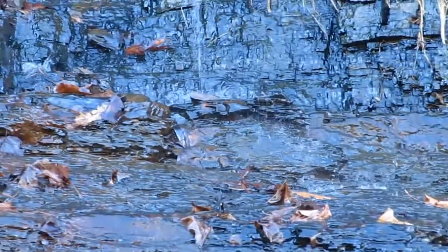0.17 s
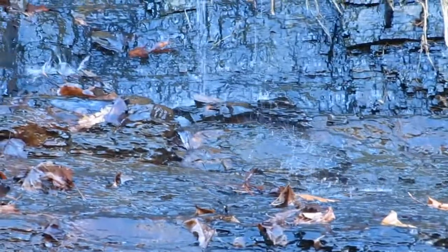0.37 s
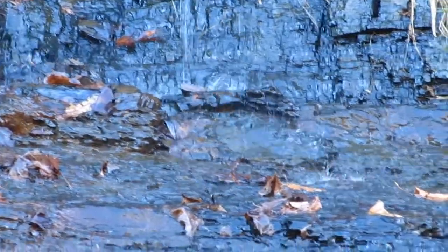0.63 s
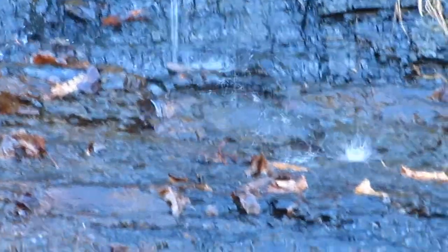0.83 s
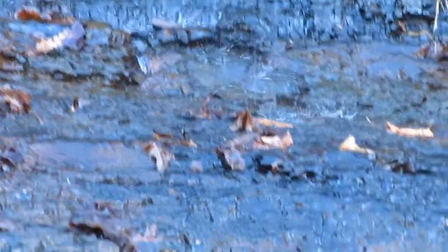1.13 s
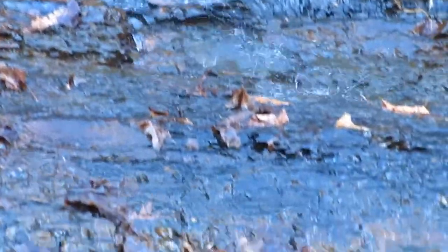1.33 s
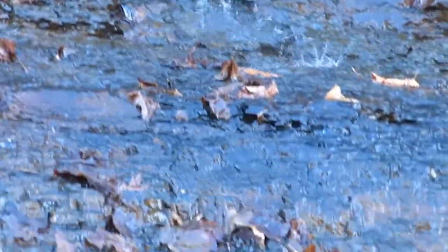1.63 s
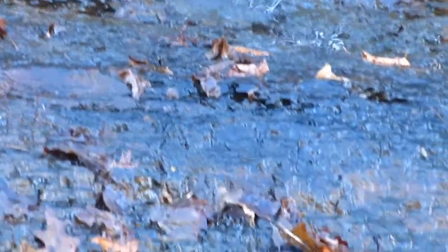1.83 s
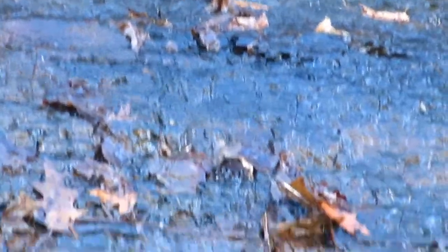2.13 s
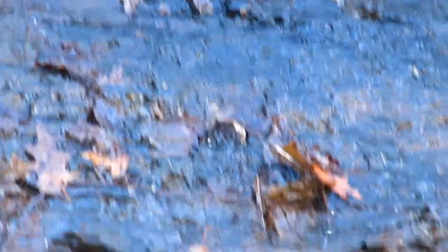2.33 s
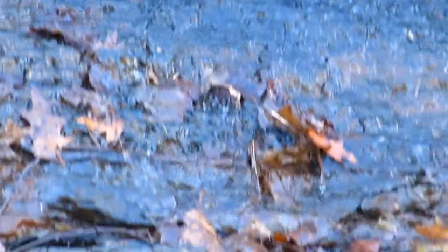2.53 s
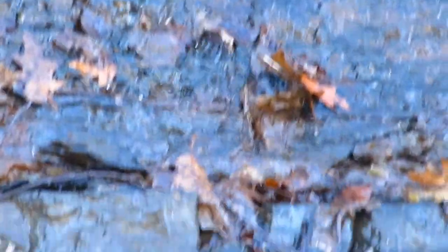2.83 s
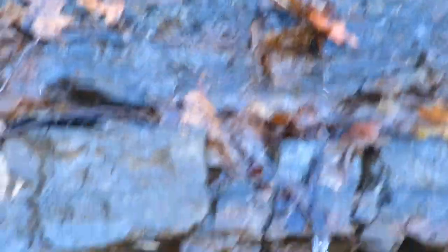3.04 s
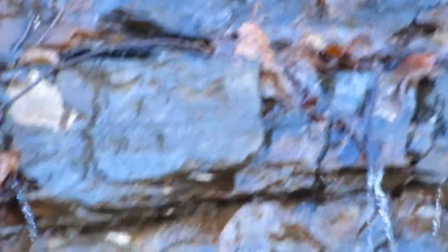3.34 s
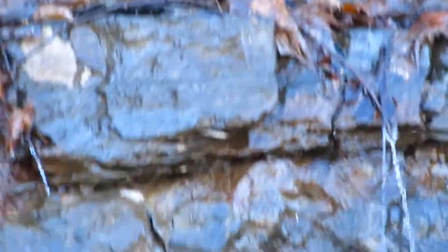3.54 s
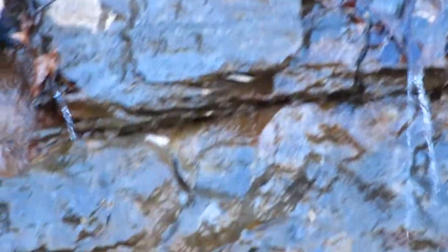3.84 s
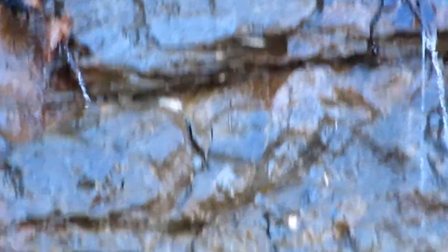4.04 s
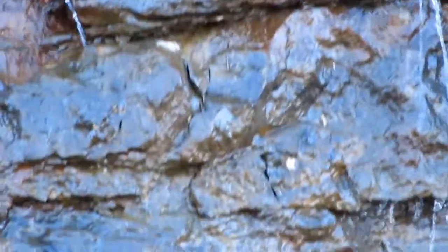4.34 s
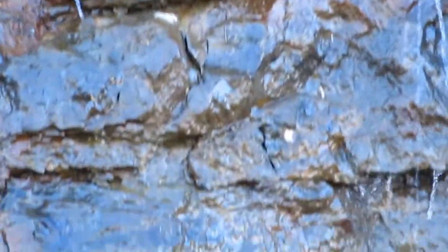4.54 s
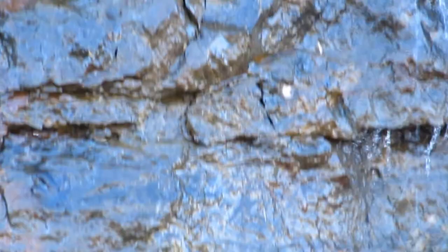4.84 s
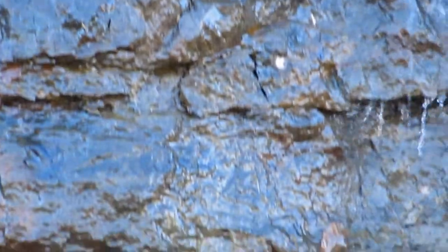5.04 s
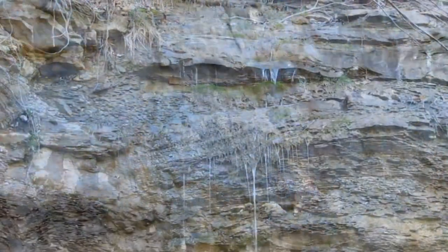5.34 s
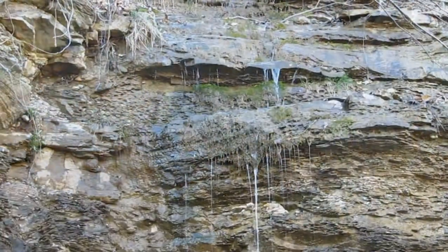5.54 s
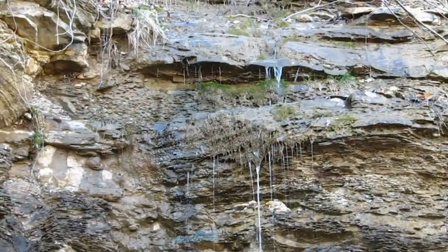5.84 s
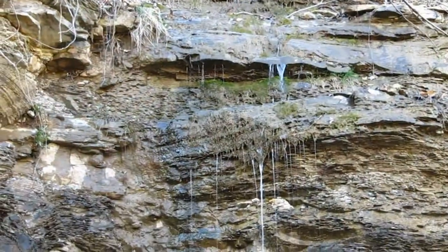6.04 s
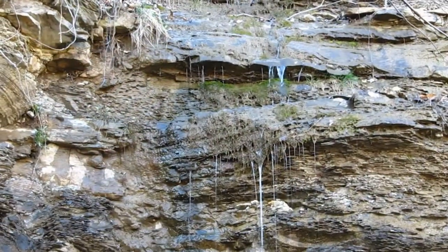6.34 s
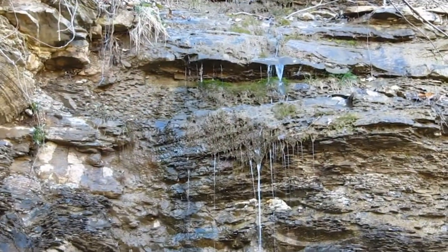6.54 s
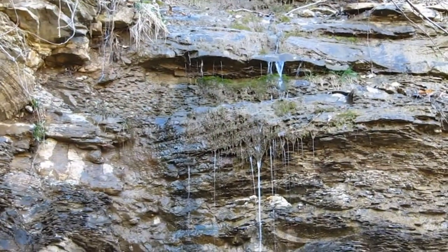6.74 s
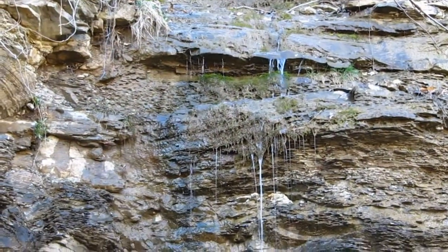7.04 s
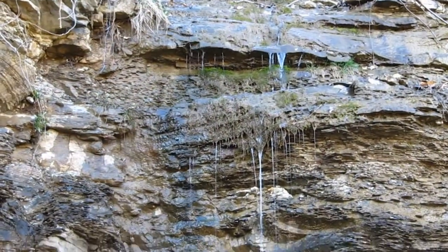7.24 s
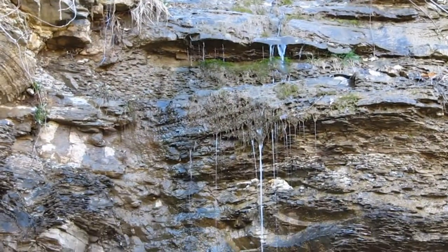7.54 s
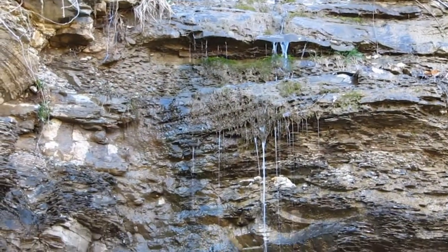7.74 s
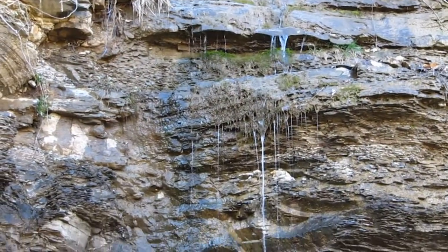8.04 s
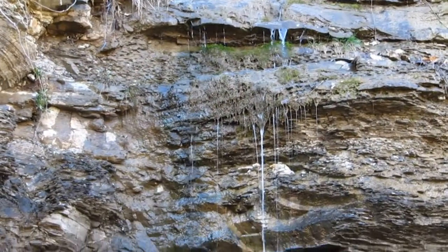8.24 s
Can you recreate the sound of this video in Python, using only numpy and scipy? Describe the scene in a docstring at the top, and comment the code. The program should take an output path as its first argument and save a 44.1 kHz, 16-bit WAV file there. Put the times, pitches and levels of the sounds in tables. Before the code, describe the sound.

Close, fizzy trickle with bright drop smacks and puddle plops under buffeting wind, then a slightly more distant trickle as the wind lulls.

```python
"""At the foot of a wet rock face, spring water trickles down and splashes, heard from close by; at 5.585 s the
scene changes and the trickle takes on another colour. The trickle is random clicks, short bursts of droplets
and blips of small bubbles, coloured for each part. Large drops smack on the rock or plop into puddles, each a
crack and a dying spray; air gurgles as ringing bubbles. Wind on the microphone is filtered pulses that swell
with gusts, plus single thumps, with a lull near the end. A dull wash comes from farther along the rock."""
import sys
import numpy as np
from scipy import signal
from scipy.fft import rfft, irfft
from scipy.io import wavfile
from scipy.ndimage import uniform_filter1d

SR = 44100
rng = np.random.default_rng(int(sys.argv[2]) if len(sys.argv) > 2 else 0)


def digitize_waveform(pressure):
    """Quantize a signal to 16-bit integers and store it at the path in sys.argv[1].

    Rows of a 2-D input are taken as channels; values are limited to [-1, 1].
    """
    field = np.atleast_2d(pressure).T
    bounded = np.clip(field, -1, 1)
    quanta = np.round(bounded * 32767).astype(np.int16)
    wavfile.write(sys.argv[1], SR, quanta)


N = 369999

# Colour of the water farther along the rock: (frequency [Hz], gain [dB])
FAR_WASH_COLOUR = [(150, -1), (250, 3), (382, 0.5), (426, 6.5), (647, 3.5), (1000, -0.5), (1180, 9),
                   (1350, -8), (2200, -120)]
# The far wash swells as the microphone swings up the rock face: (time [s], level [dB])
FAR_WASH_LEVEL = [(0, -63), (1.5, -62), (2.7, -46), (4.3, -49.5), (5.6, -54), (8.39, -57.5)]

# Light breeze on the microphone between gusts, with its lull: (time [s], level [dB])
BREEZE_LEVEL = [(0, -26), (1.45, -28), (4.4, -25.5), (6.22, -25), (6.29, -45), (6.55, -48), (7.2, -50),
                (7.5, -46), (8.39, -45)]
# Gusts over the microphone, levels before the waver: (start [s], length [s], level [dB])
WIND_GUSTS = [(0.154, 0.21, -22), (0.415, 0.18, -25), (0.72, 0.09, -21.5), (0.835, 0.078, -19.5),
              (1.008, 0.302, -20.5), (1.651, 0.16, -23), (1.927, 0.094, -21), (2.073, 0.21, -18),
              (2.325, 0.15, -17.5), (2.487, 0.265, -18.5), (2.768, 0.26, -18), (3.035, 0.46, -20),
              (3.49, 0.57, -19), (4.04, 0.302, -20.5), (4.587, 0.044, -19.5), (4.814, 0.13, -20),
              (5.021, 0.58, -19.5), (5.72, 0.08, -18.5), (5.839, 0.37, -19.5), (6.84, 0.025, -38),
              (7.886, 0.025, -28.5), (8.066, 0.39, -21)]
# Colour of wind on the microphone, before its bands are levelled: (frequency [Hz], gain [dB])
WIND_COLOUR = [(11, -37), (18, 3), (59, 3), (119, 2), (268, -6.5), (750, -38), (980, -38), (1650, -120)]
# Single eddies that thump the microphone, before the low-pass: (time [s], peak [dB], centre [Hz])
EDDY_THUMPS = [(0.192, -13.5, 179), (0.258, -18, 151), (1.052, -11, 110), (1.124, -10, 89.5),
               (1.193, -10.5, 149), (1.21, -11, 90), (1.555, -19, 151), (1.977, -16, 110), (2.122, -9, 189),
               (2.157, -8.5, 175), (2.177, -17, 159), (2.214, -7, 151), (2.242, -12.5, 151),
               (2.369, -7.5, 101), (2.401, -10, 200), (2.451, -7.5, 190), (2.596, -17, 307),
               (2.803, -4.5, 240), (2.973, -3, 193), (3.17, -19, 180), (3.817, -17, 174),
               (3.925, -6.5, 236), (3.949, -17, 264), (5.414, -16, 191), (5.85, -17, 196),
               (7.905, -28, 156)]

# Hollow resonances that colour all the water: (centre [Hz], width [Hz], boost [dB])
HOLLOW_RESONANCES = [(430, 38, 3), (754, 47, 4), (1160, 69, 1), (1600, 29, 4.5), (2430, 38, 2.5),
                     (2810, 18, 4), (4220, 190, 2.5)]
# Air pockets gurgling in puddles; the first bubble is 10 dB under the level:
# (time [s], level [dB], pitch [Hz])
AIR_POCKETS = [(0.02, -21, 880), (1.018, -26, 900), (3.905, -39, 550), (4.634, -21, 760),
               (5.724, -21.5, 1170), (6.133, -29, 745), (6.44, -26, 780), (6.591, -18.5, 1200),
               (6.635, -21, 1160), (6.949, -29.5, 584), (7.327, -30, 706), (7.355, -25.5, 720)]
# Drops that plop into puddles: (time [s], crack peak before the cavity rings [dB], centre [Hz],
# width [share of the centre])
PUDDLE_DROPS = [(0.0034, -12, 3070, 0.32), (0.1692, -16.5, 3430, 0.29), (0.205, -30, 1560, 0.25),
                (0.2174, -17, 3370, 0.59), (0.345, -19, 3140, 0.44), (1.0733, -24, 3760, 0.3),
                (1.3475, -10.5, 2920, 0.19), (1.6197, -12.5, 3200, 0.85), (1.7165, -22.5, 2160, 0.4),
                (3.3272, -16, 3620, 0.71), (3.43, -24, 2570, 0.44), (3.495, -17, 2260, 0.33),
                (3.6345, -18.5, 2910, 0.44), (3.916, -21, 1960, 0.27), (4.2606, -19, 1980, 0.37),
                (4.3634, -20, 1920, 0.48), (4.635, -23, 2460, 0.5), (5.0803, -22, 4170, 0.4),
                (5.1608, -11.5, 2930, 0.4), (5.6515, -17.5, 2800, 0.6), (5.7227, -16.5, 2300, 0.79),
                (5.7607, -19, 3050, 0.4), (6.3007, -19, 2940, 0.33), (6.5944, -27.5, 2070, 0.36),
                (6.8678, -10.5, 3880, 0.25), (7.0596, -22, 3380, 0.4), (7.2458, -23, 3000, 0.4),
                (7.4725, -16, 3970, 0.32), (7.544, -22, 3100, 0.26), (7.7177, -18, 4200, 0.4),
                (7.7805, -20, 3560, 0.4), (7.8447, -21.5, 3140, 0.37), (7.866, -22, 3620, 0.23),
                (8.318, -15, 2350, 0.87)]
# Large drops that smack on wet rock: (time [s], crack peak [dB], centre [Hz])
ROCK_DROPS = [(0.077, -15.5, 9400), (0.2166, -18, 8480), (0.344, -11, 9130), (0.629, -8.5, 6530),
              (1.0773, -8, 7200), (1.1158, -13, 10100), (1.1996, -11.5, 9400), (1.3483, -16, 8200),
              (1.6217, -3.5, 7800), (1.7805, -7, 9600), (2.003, -12.5, 8340), (2.554, -9, 7850),
              (2.8222, -14, 9270), (3.448, -11, 7900), (3.619, -11, 8300), (3.7238, -17, 8880),
              (4.0378, -11, 8300), (4.152, -19, 8670), (4.2612, -16, 7000), (4.557, -13.5, 8200),
              (5.093, -12.5, 7600), (5.1617, -13.5, 5400), (5.3292, -11.5, 9700), (5.5596, -8.5, 7800),
              (6.288, -9.5, 7770), (6.691, -15, 9500), (7.0303, -14, 9700), (7.146, -14.5, 9500),
              (7.805, -19, 9430), (8.2607, -14, 8600), (8.2702, -8.5, 6750)]
# Colour of the splashing from close by: (frequency [Hz], gain [dB])
CLOSE_COLOUR = [(410, -18), (700, -6), (885, -4.5), (1050, -8), (1150, 0.5), (1320, -4.5), (1590, -3),
                (1790, -4.5), (2350, -1.5), (2970, 0.5), (4450, -4.5), (6740, 2.5), (8860, 5.5),
                (11500, -3), (15700, -21.5)]
# Colour of the trickle after the scene changes: (frequency [Hz], gain [dB])
AFTER_CHANGE_COLOUR = [(410, -13), (700, -11), (767, -4.5), (840, -8.5), (1010, -6), (1090, -8.5), (1210, 1),
                       (1430, -7), (1630, -3.5), (1910, -6), (2040, -3.5), (3090, -1), (6160, -2), (9840, 6),
                       (15700, -18.5)]
# Trickle before the two gains below: (time [s], babble under 5 kHz [dB], fizz above it [dB])
TRICKLE_LEVEL = [(0, -35, -30.0), (0.55, -35.5, -28.5), (1.45, -35.5, -29), (1.85, -38.0, -31.5),
                 (2.6, -35.0, -28.5), (3.2, -36.5, -30), (3.45, -34.5, -27.5), (4.5, -34.5, -28.0),
                 (5.58, -33.0, -26.5), (5.59, -38, -33.0), (6.05, -37.5, -31), (6.45, -35.0, -30),
                 (6.8, -35, -30.5), (7.15, -36, -30.5), (7.6, -34.5, -29.0), (8.0, -37.5, -30),
                 (8.39, -31.5, -27)]

SCENE_CHANGE_S = 5.585  # the scene changes at once
BABBLE_GAIN_DB, FIZZ_GAIN_DB = -3.5, -3
SPRAY_DB, SPRAY_GROWTH = -23, 0.53  # spray of a 0 dB drop; dB of spray per dB of drop
GUST_RISE_S, GUST_FALL_S = 0.016, 0.045  # straight rise; fall to 1/e
STIFF_DB = -19  # level of a stiff gust, above which only the flutter still grows
FLUTTER_DB, FLUTTER_GROWTH = -29, 2.38  # gain above 200 Hz in a stiff gust; its dB per dB of wind
RUMBLE_DB, RUMBLE_GROWTH = -20, 0.93  # the same for the rumble under 200 Hz
WAVER_DB, WAVER_HZ = 0.5, 5.8  # random wavering of the wind: rms depth, rate above which it fades
RECORDER_EDGE_HZ = 15800


def amp(db):
    """Decibels to gain."""
    return 10 ** (np.asarray(db) / 20)


def evened(x):
    """Scales a sound to an rms of 1."""
    return x / np.sqrt(np.mean(x ** 2) + 1e-20)


def curves(rows):
    """Each column of a timed table, at every sample."""
    s, *columns = np.transpose(rows)
    return [np.interp(np.arange(N) / SR, s, c) for c in columns]


def add(mix, s, sound):
    """Adds a sound into the mix at time s."""
    part = mix[max(round(s * SR), 0):][:len(sound)]
    part += sound[:len(part)]


def coloured(x, spectrum):
    """Gives a sound a smooth spectrum, read between the points on a log frequency scale."""
    hz, db = np.transpose(spectrum)
    bins = np.fft.rfftfreq(len(x), 1 / SR)
    gain = amp(np.interp(np.log(bins + 1), np.log(hz + 1), db))
    return irfft(rfft(x) * gain, len(x))


def low_pass(hz):
    """A fourth-order low-pass."""
    return signal.butter(4, hz, fs=SR, output="sos")


def split(x, hz):
    """The parts of a sound under and above hz, each at an rms of 1."""
    low = signal.sosfiltfilt(low_pass(hz), x)
    return evened(low), evened(x - low)


def resonate(x, hz, width_hz):
    """A resonance of gain 1 at its centre."""
    return signal.lfilter(*signal.iirpeak(hz, hz / width_hz, fs=SR), x)


def impacts(size, per_s, spread_db):
    """A train of random clicks of uneven strength and either sign, at an rms of 1."""
    strength = amp(spread_db * np.minimum(rng.exponential(1, size), 4))
    sign = rng.choice([-1, 1], size)
    struck = rng.random(size) < per_s / SR
    return evened(strength * sign * struck)


def patter(per_s, spread_db, t60, tint_db, rise_s, count=17, size=3072):
    """Many middling drops, each a short spray of droplets with a random tint of its own."""
    t, out = np.arange(size) / SR, np.zeros(N)
    tint_hz = np.geomspace(600, 15000, count)
    droplets = impacts(N + size, 16000, 5.0)
    for when, heft, life, *tint in rng.random((int(per_s * N / SR), 3 + count)):
        envelope = (1 - np.exp(-t / rise_s)) * amp(-60 * t / (t60 * (.5 + life)))
        burst = envelope * droplets[int(when * N):][:size]
        colour = np.transpose([tint_hz, tint_db * np.array(tint) ** 2])  # a few bands stand out
        add(out, when * N / SR, amp(spread_db * heft ** 2) * coloured(burst, colour))
    return evened(out)


def wash():
    """Far splashing, low and soft: steady noise and a sparse patter."""
    drops = patter(per_s=45, spread_db=7.5, t60=0.023, tint_db=4, rise_s=0.0014)
    far = rng.standard_normal(N) + 1.8 * drops
    return amp(curves(FAR_WASH_LEVEL)[0]) * evened(coloured(far, FAR_WASH_COLOUR))


def wind_level():
    """Gusts rise quickly out of the breeze, hold and die away, wavering all the while; in dB."""
    t, strength = np.arange(N) / SR, amp(curves(BREEZE_LEVEL)[0])
    for s, length, db in WIND_GUSTS:
        rise = np.clip((t - s) / GUST_RISE_S, 0, 1)
        fall = np.exp(-np.maximum(t - s - length, 0) / GUST_FALL_S)
        strength = np.maximum(strength, amp(db) * rise * fall)
    rates = [(WAVER_HZ / 4, -20), (WAVER_HZ / 2, 0), (WAVER_HZ, 0), (WAVER_HZ * 4, -100)]
    waver = evened(coloured(rng.standard_normal(N), rates))
    return 20 * np.log10(strength) + WAVER_DB * waver


def wind():
    """Eddies pass the microphone as pressure bumps; they come in clumps and swell with each gust."""
    clump_rates = [(8, 0), (28, 0), (60, -40), (120, -100)]
    clumps = np.tanh(evened(coloured(rng.standard_normal(N), clump_rates)))
    rumble, flutter = split(coloured(impacts(N, 1200, 2.5), WIND_COLOUR), 200)
    deep, body = split(rumble, 70)
    # the small, fast eddies crowd into the clumps more than the large ones
    bands = deep, body * amp(4.2 * clumps), flutter * amp(8.6 * clumps)
    # level each band over 6000 samples, so that the gusts alone set the slow swell
    deep, body, flutter = (x / np.sqrt(uniform_filter1d(x ** 2, size=6000) + 1e-6) for x in bands)
    force_db = wind_level() - STIFF_DB
    calm_db = np.maximum(-force_db, 0)
    # in a lull the largest eddies outweigh the rest
    rumble = deep * amp(0.21 * calm_db - 7.0) + body * amp(-.25 * calm_db - 3.5)
    rumble *= amp(RUMBLE_DB - RUMBLE_GROWTH * calm_db)
    return rumble + flutter * amp(FLUTTER_DB + FLUTTER_GROWTH * force_db)


def thumps():
    """A strong eddy sucks at the microphone, and the pressure swings back."""
    out, t = np.zeros(N), np.arange(SR // 20) / SR
    for s, db, hz in EDDY_THUMPS:
        u = 2 * np.pi * np.sqrt(3) * hz * t
        bump = u ** 2 * (u - 3) * np.exp(-u)
        add(out, s, amp(db) * bump / abs(bump).max())
    return signal.sosfilt(low_pass(760), out)


def hollows(water):
    """A few fixed resonances ring with the water."""
    rings = ((amp(db) - 1) * resonate(water, hz, width) for hz, width, db in HOLLOW_RESONANCES)
    return water + sum(rings)


def bubble(hz, cycles, glide):
    """A trapped bubble rings for some cycles and rises in pitch as it nears the surface."""
    age = np.arange(0, 2, hz / cycles / SR)  # 1 when the cycles are up
    ring = np.sin(2 * np.pi * cycles * (age + glide * age ** 2 / 2))
    return ring * np.exp(-3 * age) * (1 - np.exp(-20 * age))


def gurgles(count=9):
    """A pocket of air breaks into a few bubbles of unlike size, at staggered times."""
    out = np.zeros(N)
    for s, db, hz in AIR_POCKETS:
        for k, (late, size) in enumerate(rng.random((count, 2))):
            pitch = hz * 1.59 ** (2 * size - 1) if k else hz
            ring = bubble(pitch, cycles=12.2, glide=0.13)
            add(out, s + 0.0026 * k * late, amp(db - 10 - 1.0 * k) * ring)
    return out


def spray_share(db):
    """Spray in dB re a drop's crack: harder drops gain more crack than spray."""
    return SPRAY_DB + SPRAY_GROWTH * db - db


def splash(hz, width_hz, spray_db, t60, crack_s, broad, size=4096):
    """One drop: a crack, a weaker one as its crater closes, then a dying spray of droplets; peak near 1."""
    t = np.arange(size) / SR
    crack = rng.choice([-1, 1], size) * np.exp(-t / crack_s)
    add(crack, rng.uniform(.0015, .003), rng.uniform(.45, .8) * crack)
    spray = impacts(size, 12000, 3.5) * amp(-60 * t / t60) * (1 - np.exp(-t / .0005))

    def at_close_range(x):
        """A resonance and some broad sound, in the colour of the near place."""
        struck = resonate(x, hz, width_hz) + broad * x
        return coloured(np.pad(struck, (SR // 1400, 0)), CLOSE_COLOUR)  # room for the front of the crack

    crack, spray = at_close_range(crack), at_close_range(spray)
    return crack / abs(crack).max() + amp(spray_db) * spray / spray[:size // 8].std()


def plops():
    """Drops in shallow water ring lower, in the small cavity that they open."""
    out = np.zeros(N)
    for s, db, hz, width in PUDDLE_DROPS:
        drop = splash(hz, width * hz, spray_share(db), t60=0.079, crack_s=.0013, broad=.05)
        add(out, s, amp(db) * resonate(drop, hz, hz))
    return out


def smacks():
    """Large drops burst brightly on the rock."""
    out = np.zeros(N)
    for s, db, hz in ROCK_DROPS:
        drop = splash(hz, 2100, spray_share(db), t60=0.11, crack_s=.0006, broad=.13)
        add(out, s, amp(db) * drop)
    return out


def bubbles(per_s, low_hz, high_hz, spread_db):
    """Small bubbles of every size blip in the running water."""
    out = np.zeros(N)
    for when, pitch, heft, life, rise in rng.random((int(per_s * N / SR), 5)):
        hz = low_hz * (high_hz / low_hz) ** pitch
        ring = np.sqrt(hz) * bubble(hz, 14 + 32 * life, 0.19 * rise)
        add(out, when * N / SR, amp(spread_db * heft ** 3) * ring)
    return evened(out)


def trickle():
    """Thin streams break up into drops and bubbles over a fine fizz of droplets."""
    drops = impacts(N, 12000, 5.4)
    drops += patter(per_s=220, spread_db=2.5, t60=0.053, tint_db=17.5, rise_s=0.00039)
    drops += amp(-11.5) * bubbles(per_s=110, low_hz=751, high_hz=7920, spread_db=11.5)
    near = evened(coloured(drops, CLOSE_COLOUR))
    back = evened(coloured(drops, AFTER_CHANGE_COLOUR))
    water = np.where(np.arange(N) / SR < SCENE_CHANGE_S, near, back)
    babble, fizz = split(water, 5000)
    babble_db, fizz_db = curves(TRICKLE_LEVEL)
    return babble * amp(babble_db + BABBLE_GAIN_DB) + fizz * amp(fizz_db + FIZZ_GAIN_DB)


def scene():
    """Water and wind at one microphone."""
    water = wash() + gurgles() + plops() + smacks() + trickle()
    return (wind() + thumps() + hollows(water))[None]


def record(dry):
    """The recorder's band limit."""
    low = signal.firwin(511, RECORDER_EDGE_HZ, window=("kaiser", 9), fs=SR)
    return signal.oaconvolve(dry, low[None], "same")


dry = scene()
out = record(dry)
digitize_waveform(out)
```